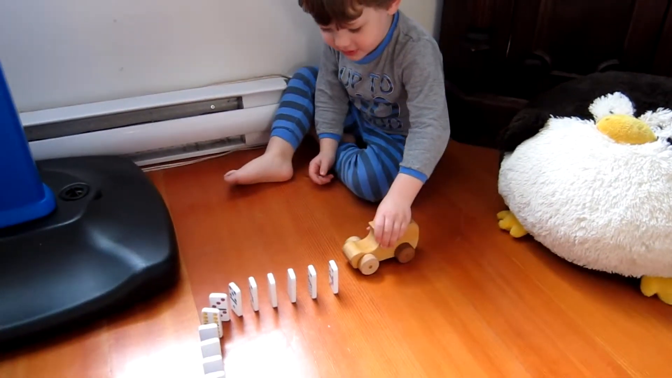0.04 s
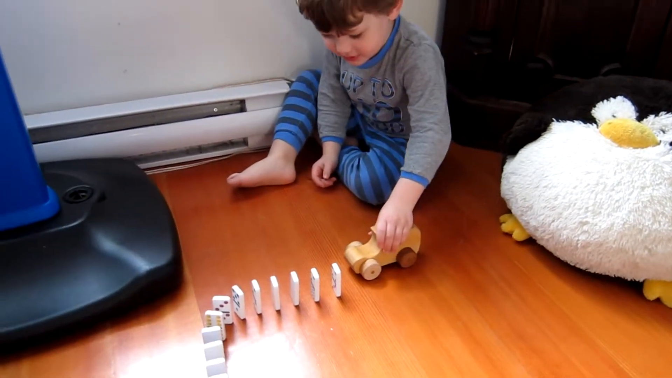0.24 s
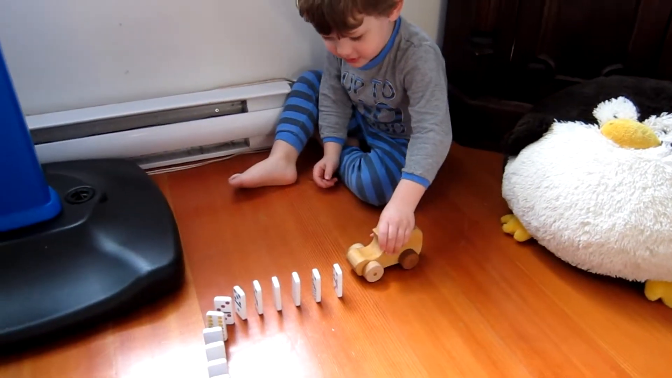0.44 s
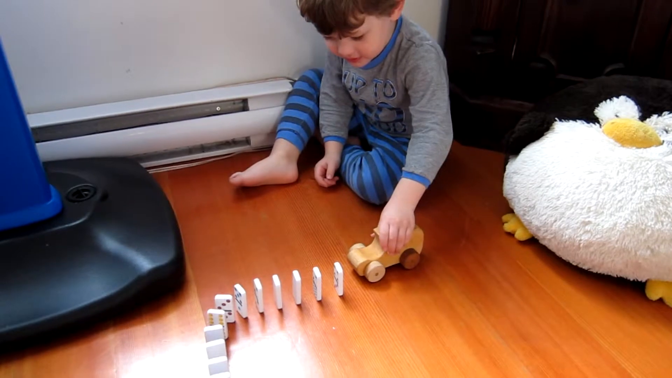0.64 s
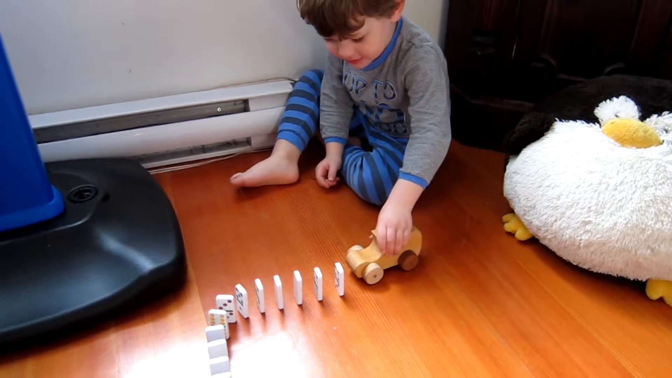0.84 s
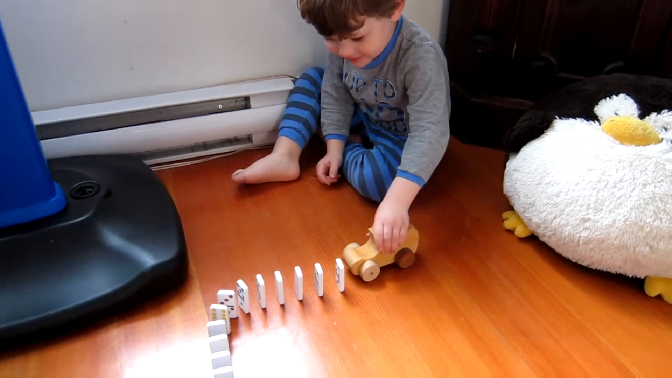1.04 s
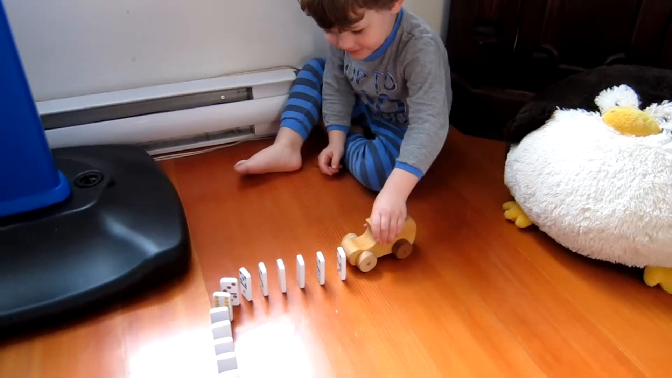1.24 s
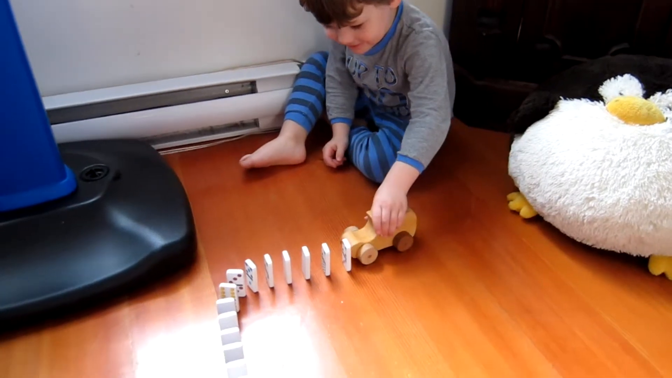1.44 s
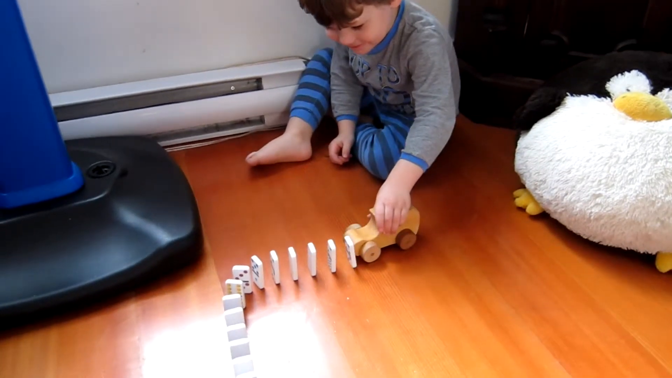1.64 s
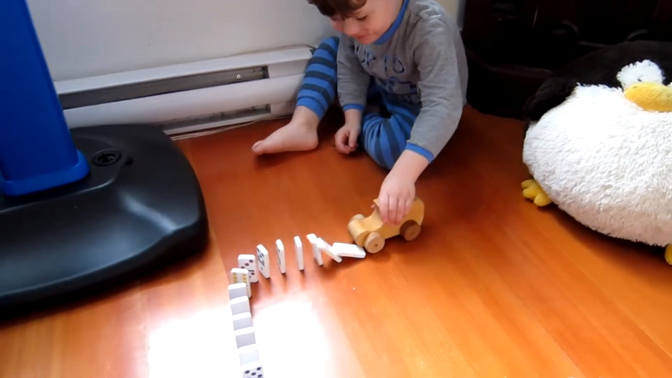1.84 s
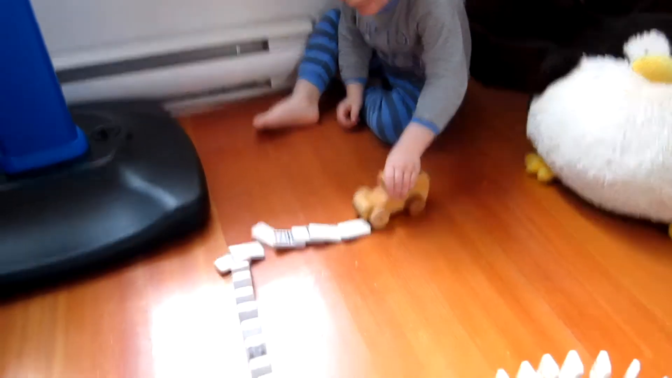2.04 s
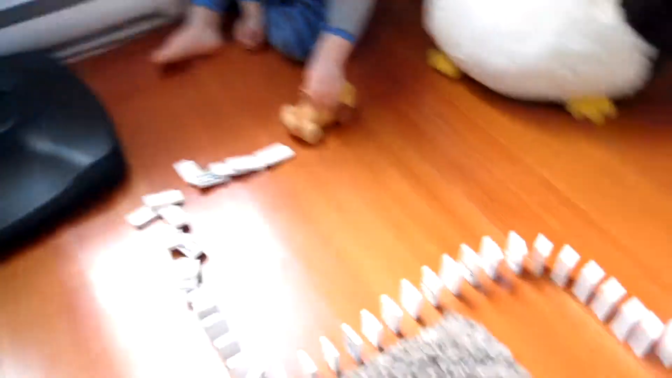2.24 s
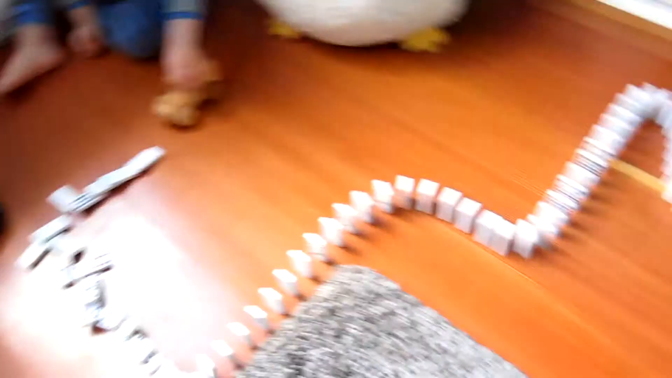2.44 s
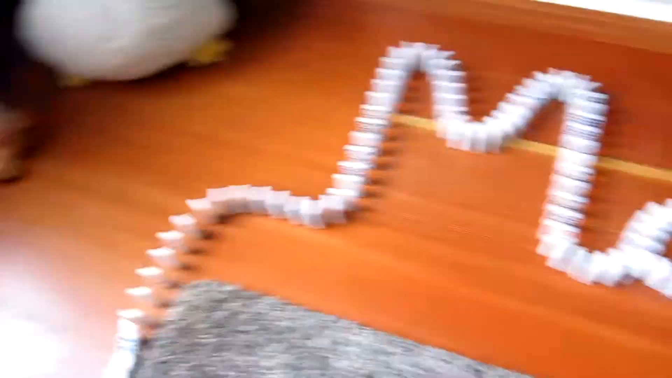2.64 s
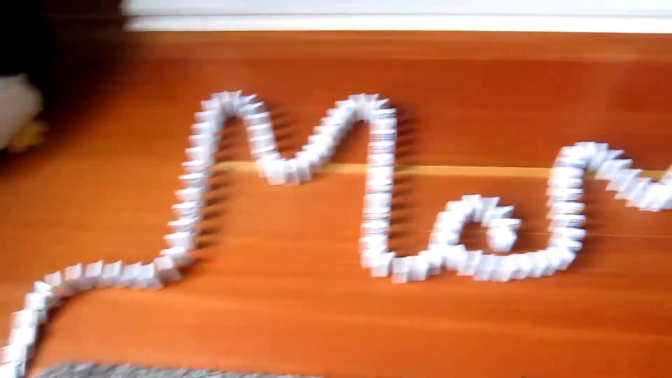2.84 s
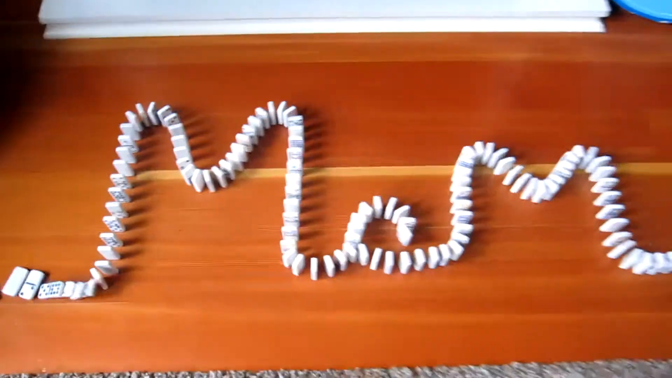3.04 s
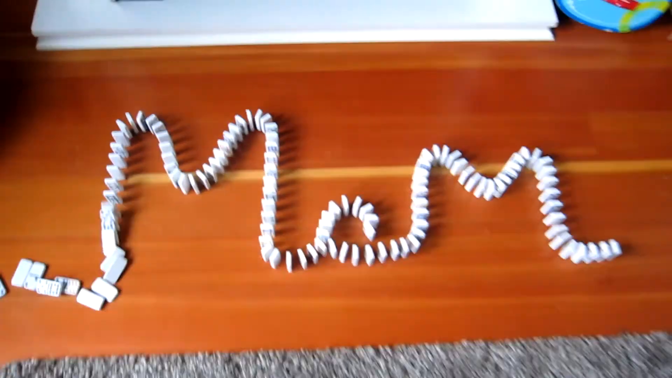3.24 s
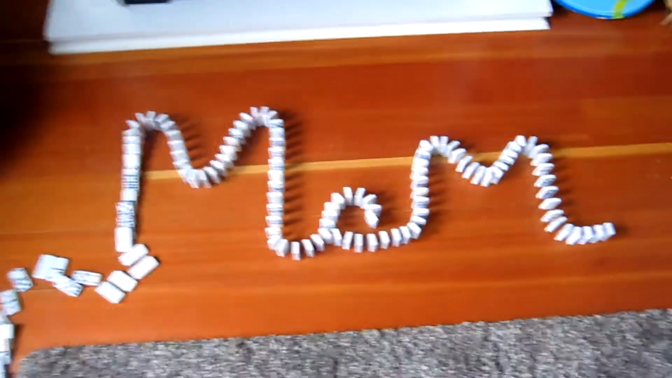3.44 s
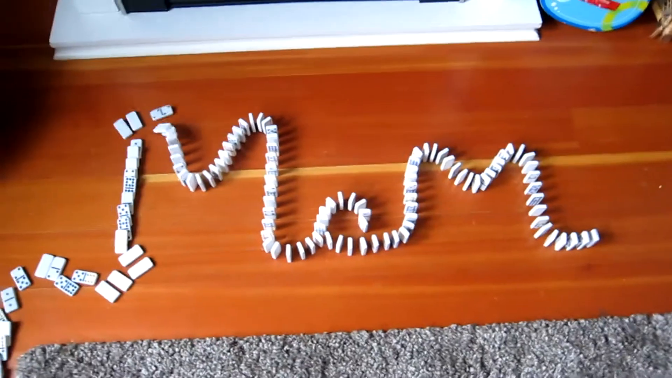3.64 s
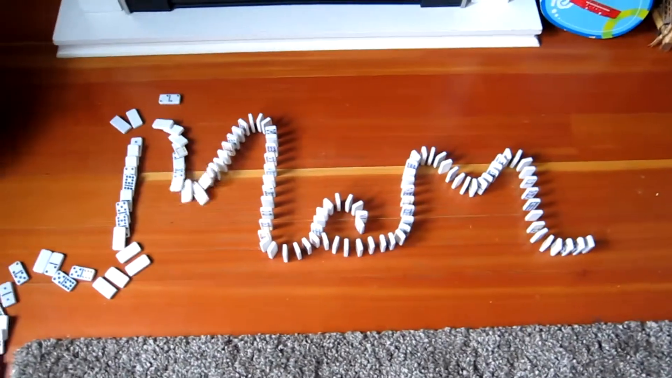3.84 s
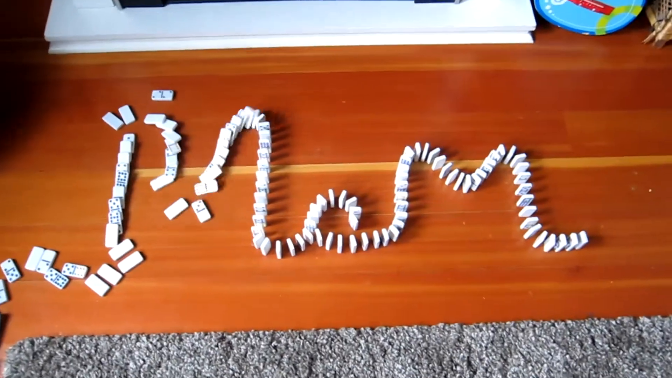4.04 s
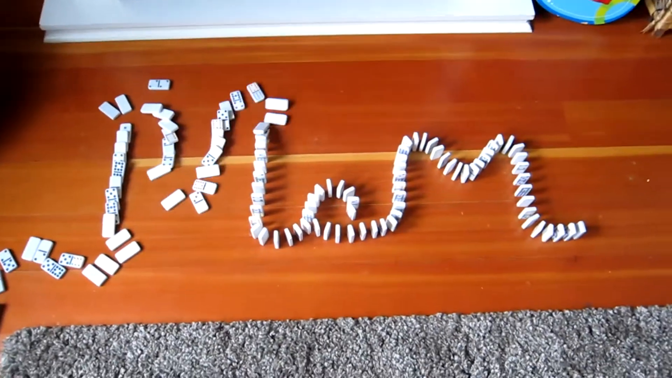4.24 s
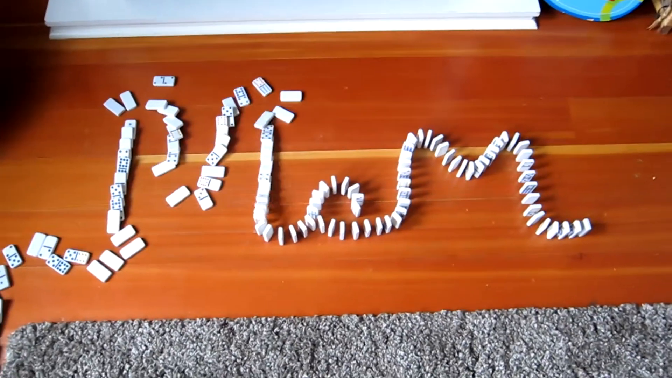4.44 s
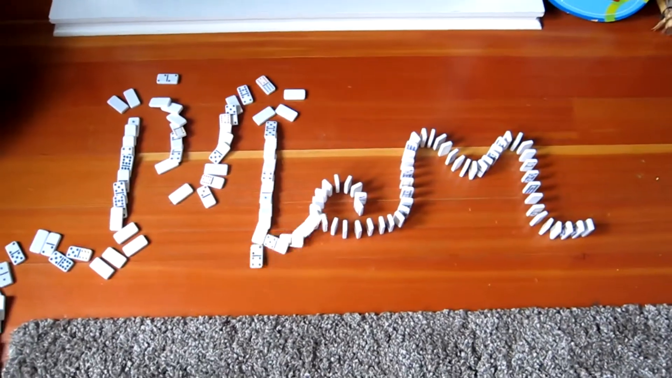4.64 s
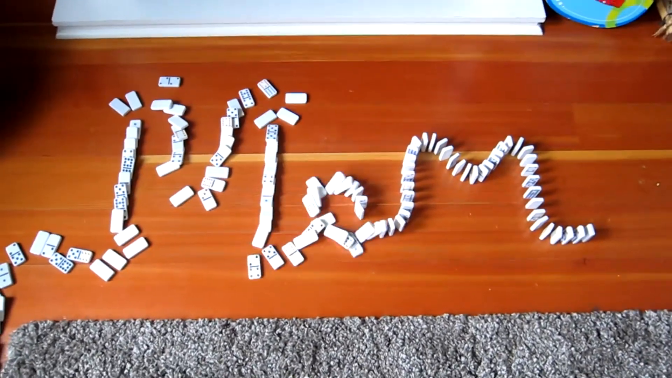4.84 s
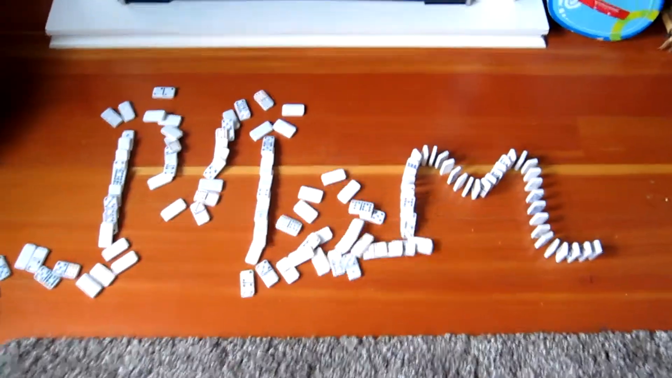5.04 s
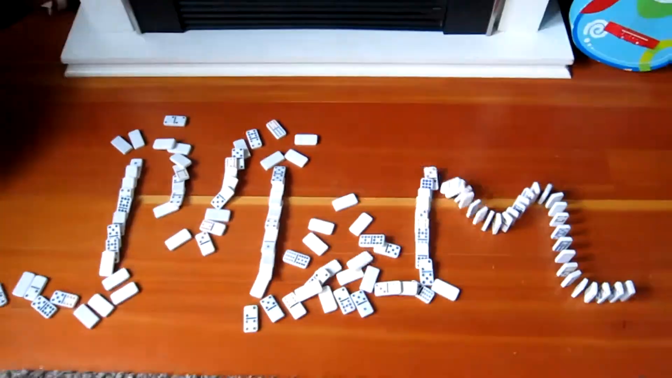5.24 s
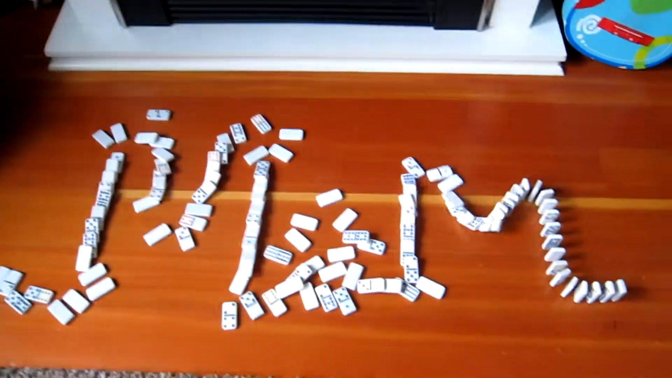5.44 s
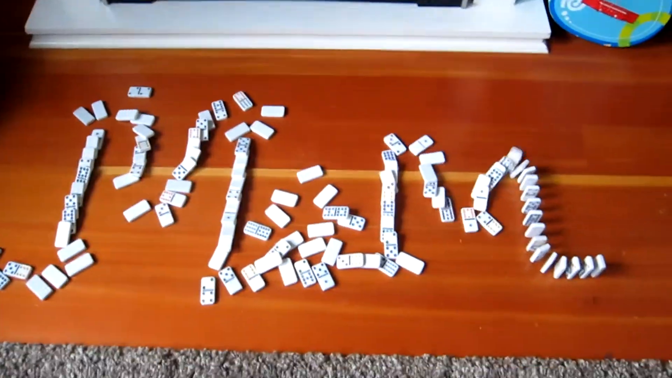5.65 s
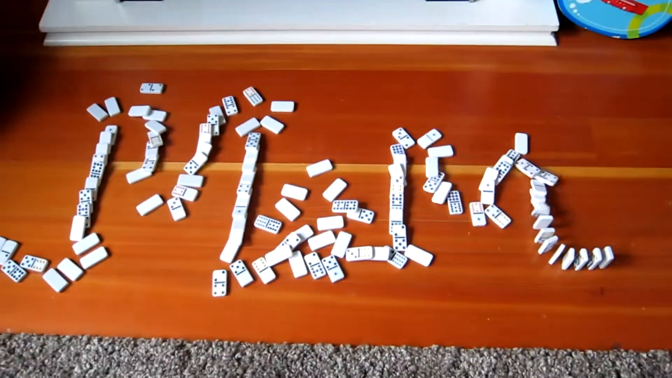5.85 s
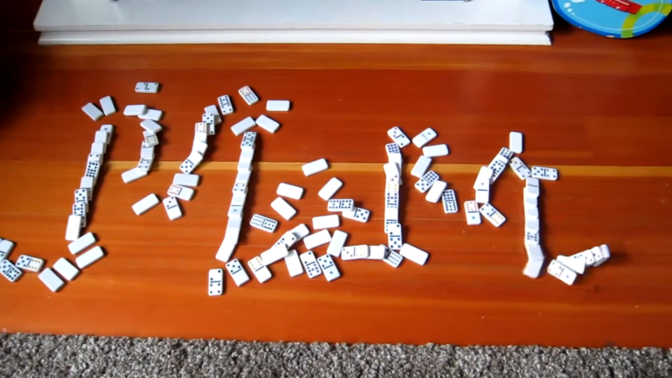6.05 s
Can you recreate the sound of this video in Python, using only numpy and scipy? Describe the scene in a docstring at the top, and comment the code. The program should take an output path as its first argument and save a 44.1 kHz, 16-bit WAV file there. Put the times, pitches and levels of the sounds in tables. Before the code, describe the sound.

After nearly two seconds of quiet room hum, a long chain of plastic dominoes topples on a wooden floor in a fast, bright clatter.

```python
"""A quiet room hums and hisses, with three faint ticks, then a long chain of plastic domino tiles
topples on a wooden floor, close to a hand-held camera with two microphone ports.
Each tile clacks (a coloured noise burst), rings briefly (damped sines) and slaps the boards;
sliding tiles rattle, the floorboards boom and the walls answer with a noise tail.
The camera's gain control pulls the hum down once the clatter starts."""
import sys
import numpy as np
from scipy import signal
from scipy.fft import rfft, irfft, next_fast_len
from scipy.io import wavfile
from scipy.ndimage import uniform_filter1d, map_coordinates

SR = 44100
rng = np.random.default_rng(int(sys.argv[2]) if len(sys.argv) > 2 else 0)


def transcribe(signal):
    """Save signal, clipped to [-1, 1], as a 16-bit WAV file at the path in sys.argv[1]."""
    frames = np.atleast_2d(signal).T
    limited = np.clip(frames, -1, 1)
    pcm = np.round(limited * 32767).astype(np.int16)
    wavfile.write(sys.argv[1], SR, pcm)


N = 269045

# Clear tile knocks, ahead of the gain control:
# (time [s], clack level [dB], ring level [dB], ring pitch [Hz])
TILE_KNOCKS = [(1.8625, 15, 18, 6805), (1.9028, -7, -2, 6500), (1.921, 7, 3, 7200),
               (1.926, 10.5, 17.5, 6540), (1.95, 7, -2, 6825), (1.9717, 9, 14.5, 6620),
               (1.979, 6, -6, 7300), (2.0022, 6.5, 16, 6440), (2.0126, 9.5, 1, 6660),
               (2.029, 9, 15.5, 6730), (2.0463, 10, 10, 6760), (2.076, 5, 15, 6560), (2.0869, 7, 5, 6430),
               (2.1014, 6.5, 16, 7000), (2.1171, 12, 12, 6845), (2.1352, 15.5, 10, 6550),
               (2.1605, 14.5, 14, 6860), (2.2652, 3, 13, 6720), (2.2914, 8, 1, 6600),
               (2.3238, 7.5, 13, 6900), (2.3354, 8.5, 12, 7400), (2.359, 4.5, 18, 7060),
               (2.3838, 1, 17.5, 6570), (2.417, 10, 20, 6700), (2.427, 6, 19, 6770),
               (2.455, 4.5, 20.5, 6655), (2.4733, 2, 20, 6770), (2.5096, 11, 14.5, 7040),
               (2.5457, 8, 10, 6910), (2.682, -1.5, 15, 6600), (2.7165, 6, 13.5, 6560),
               (2.7452, 9, 14, 6840), (2.808, 7, 7.5, 6600), (2.816, 12, -3, 6700), (2.9355, -1, 5, 7020),
               (3.0046, 0, -7, 6500), (3.0449, 11, -16, 6560), (3.0954, 10.5, 8.5, 6615),
               (3.1478, 11.5, 12.5, 6710), (3.2133, 9.5, -5, 6750), (3.3958, -4, 15, 6420),
               (3.4504, 3, 11, 6380), (3.4855, 5, 8, 6400), (3.525, -12, 3, 7300), (3.5374, 5.5, 5, 6960),
               (3.645, 3, -17, 6900), (3.6891, 12.5, -19, 6100), (3.7143, 8, 7, 7300),
               (3.8012, 8.5, 11, 7070), (3.8248, 1, 15, 6855), (3.841, 6, 14, 6980), (3.893, -3, 15, 7030),
               (3.9492, 12, -4, 7130), (3.957, 13, 8, 6940), (3.9702, 10, 8, 7056), (4.03, 4, 8, 6970),
               (4.0438, 6, 15, 6820), (4.068, -2, 13, 6795), (4.0997, 9.5, 8.5, 7000), (4.189, 9, 7, 6720),
               (4.2093, 12, 2, 7380), (4.2593, 4, 5, 6400), (4.2816, 13.5, -7, 7100),
               (4.3122, 11, 11, 6780), (4.326, 9, -1, 6650), (4.3798, 8, 19, 6620), (4.395, 5, -15, 6660),
               (4.4113, 6, 17.5, 6710), (4.4278, -2, 17, 6400), (4.4607, 7, 17, 6530),
               (4.5063, -8, 21, 6400), (4.5334, 8, 14.5, 6340), (4.6066, 10.5, 13, 6740),
               (4.6229, 16.5, 20.5, 6760), (4.7291, 9.5, 15, 6870), (4.7875, 6, 15.5, 6750),
               (4.8235, 7.5, 15.5, 6800), (4.8945, -1, 20, 6880), (4.9442, 14, 10.5, 6750),
               (4.9795, 17, -14, 7000), (5.0076, 17.5, 17, 6820), (5.021, -7, 15, 6950),
               (5.064, 15.5, 0, 6840), (5.0927, 14, 12, 6930), (5.1006, 12, 16, 6600),
               (5.1287, 15, 15.5, 6550), (5.1384, 8.5, 1, 6600), (5.1574, 9, 8, 6670), (5.1656, 7, 6, 6820),
               (5.189, 14, 12, 6520), (5.202, 11.5, 23.5, 6800), (5.2227, 0, 20, 6420),
               (5.282, -13, 15, 6530), (5.3231, 11.5, 8.5, 6730), (5.416, 7, 12.5, 6780),
               (5.4324, 14, 4, 7200), (5.4602, 10, 15, 6900), (5.55, 2, 9, 6470), (5.5556, 3, 15, 6900),
               (5.5806, 18.5, 7, 6440), (5.639, 9, 13, 6600), (5.7334, 18, 10.5, 6800),
               (5.832, 9.5, 1, 7210), (5.906, 6, 7, 6990), (5.9343, 0, 10.5, 6740), (5.96, 1, 11, 6460),
               (5.9821, 12.5, 1, 7340), (6.0446, 11, -7, 6825), (6.084, 9, 2, 6820)]
# Tiles sliding and bouncing on the heap: (time [s], clack level [dB],
# then ring, low and low-middle level relative to the clack [dB])
HEAP_RATTLE = [(1.903, -18, 2, 8, 3), (2.083, -17.5, 13.5, 9, 12), (2.2, -9.5, 1.5, -4.5, 3),
               (2.35, -17, 11, 8, 17), (2.55, -7, -2, -2.5, -1), (2.7, -15, 0.5, 7, 7.5),
               (2.802, -7, 5.5, -3.5, 6.5), (2.89, -8.5, 3.5, 0, 10.5), (2.99, -6.5, 2, 3, 12.5),
               (3.16, -11.5, 4, 2, -2), (3.33, -11.5, 4, -3, 3), (3.501, -5, 5, -1.5, -4.5),
               (3.6, -10.5, 1.5, -4, 5), (3.741, -7, 1.5, 1.5, 5.5), (3.97, -9, 4, 0, 5),
               (4.14, -7.5, 3.5, -2, 3.5), (4.32, -3.5, -7.5, -2, -4), (4.55, -6.5, 7.5, -7, -2.5),
               (4.69, -13, 2, 0, 2), (4.901, -4, 1.5, -1.5, -1.5), (5.15, -0.5, 2.5, -6.5, -4),
               (5.38, -9.5, 1.5, 3, -1.5), (5.48, -7, 4.5, 1, 0), (5.65, -4.5, 1, -3.5, 1),
               (5.832, -14.5, -8, 3.5, -7), (6.01, -4, 7.5, -9, 0), (6.1, -8.5, -5, -1, -9)]
# Where the fall is heard between the ports: (time [s], left-right difference [dB])
FALL_POSITION = [(1.9, 1.5), (3.3, 3), (4.8, 1), (5.5, 0.5), (6.1, -1.5)]
# The boards under the moving fall: (time [s], pitch of the woody slap [Hz], boom level [dB],
# rattle treble level relative to the clack [dB])
FLOOR_ALONG_FALL = [(1.9, 968, -22, -1), (2.1, 1284, -25, 8), (2.22, 1000, -39, -0.5), (2.36, 1200, -30, 6),
                    (2.6, 1375, -29, -0.5), (2.73, 760, -24.5, -3), (2.86, 910, -24, 3),
                    (3.0, 1370, -23.5, 0), (3.15, 1440, -29.5, -7), (3.35, 1230, -27.5, -3.5),
                    (3.5, 1370, -28, -1.5), (3.76, 1010, -23, -3.5), (3.95, 1250, -29, 2.5),
                    (4.15, 1240, -30.5, 3.5), (4.32, 1153, -27.5, -5), (4.55, 1396, -36, 3),
                    (4.7, 1040, -34, 0.5), (5.0, 1270, -23.5, -5), (5.2, 1330, -31, -5),
                    (5.32, 810, -25, -1), (5.55, 1225, -25.5, 0), (5.83, 1288, -32, -3),
                    (6.1, 1280, -26, -5)]


def amp(db):
    """dB to gain."""
    return np.exp(np.asarray(db) * (np.log(10) / 20))


def unit(x):
    """Scaled to rms 1."""
    return x / np.sqrt(np.mean(x ** 2) + 1e-20)


def along(points, hz):
    """Interpolates (Hz, value) points on a log-frequency axis."""
    f, v = np.transpose(points)
    return np.interp(np.log(hz + 1), np.log(f + 1), v)


def filtered(x, response):
    """x with its spectrum multiplied by a response of frequency."""
    m = next_fast_len(x.shape[-1] + 8192)  # padded so that tails do not wrap round
    spectrum = rfft(x, m) * response(np.fft.rfftfreq(m, 1 / SR))
    return irfft(spectrum, m)[..., :x.shape[-1]]


def spread(pair, alike, hz):
    """Two unrelated spectra become left and right with the given likeness."""
    turn = np.arccos(np.clip(along(alike, hz), -1, 1)) / 2
    mid = pair[0] * np.cos(turn)
    side = pair[1] * np.sin(turn)
    return np.array([mid + side, mid - side])


def place(s, sounds):
    """Sums stereo sounds (2, events, samples) into the scene at times s."""
    first = np.round(s * SR).astype(int)
    at = (first[:, None] + np.arange(sounds.shape[-1])).ravel()
    return np.array([np.bincount(at, c.ravel(), N + SR)[:N] for c in sounds])


def air():
    """Steady background noise, shaped by frequency, under hum tones of slightly wavering level and phase."""
    # Spectrum of the steady background noise, with a deep dip near 8.3 kHz:
    # (frequency [Hz], relative level [dB])
    air_colour = [(20, -7), (90, -11), (130, -7), (155, 4), (225, -9), (300, 1.5), (450, -5), (600, -6),
                  (1150, -8), (2500, -17), (6300, -22.5), (7600, -32), (8300, -38), (8900, -26.5),
                  (16000, -28)]
    # Likeness of the background noise at the two ports: (frequency [Hz], likeness [0-1])
    air_likeness = [(60, 0.59), (180, 0.87), (550, 0.77), (1650, 0.19), (4970, 0.057), (15000, 0.13)]
    # Mains and appliance tones: (frequency [Hz], rms level [dB])
    hum_tones = [(60, -52), (120, -67), (450, -61.5), (921, -69.5), (1001, -73.5), (1179, -72.5),
                 (8799, -77.5)]
    m = next_fast_len(N)
    hz, t = np.fft.rfftfreq(m, 1 / SR), np.arange(N) / SR
    spectrum = spread(rfft(rng.standard_normal((2, m))), air_likeness, hz)
    spectrum = spectrum * amp(along(air_colour, hz)) * (hz > 15)
    noise = irfft(spectrum, m)[:, :N]

    def waver():
        """A smooth random curve through six random points a second."""
        return map_coordinates(rng.standard_normal(64), [t * 6])

    hum = 0
    for f, db in hum_tones:
        level = np.sqrt(2) * amp(db + .5 * waver())
        hum = hum + level * np.sin(2 * np.pi * f * t + np.sqrt(f) / 60 * waver())
    return amp(-50.9) * unit(noise) + hum


def ticks():
    """Faint crackles near the camera: short gated bursts of tilted noise above 700 Hz."""
    # Ticks before the fall: (time [s], relative level [dB], length [s], treble tilt [dB per octave])
    faint_ticks = [(1.48, -45, 0.0048, 0), (1.584, -43, 0.0039, -12.5), (1.663, -36, 0.007, -2.5)]
    out, t = np.zeros((2, N)), np.arange(N) / SR
    for s, db, length, tilt_db in faint_ticks:
        gate = np.exp(-np.abs((t - s - length / 2) / length * 2) ** 4)
        tilt = lambda hz: amp(tilt_db * np.log2(hz / 4000 + 0.11)) * (hz > 700)
        out += amp(db - 5.5) * gate * filtered(rng.standard_normal((2, N)), tilt)
    return out


def blows(s, clack_db, ring_db, ring_hz, thud_db, hollow_db, snap_db, pan_db, crack_t60, rise, lead, size=768):
    """A burst of tiny contacts coloured by tile and boards, plus the tile's ringing.
    rise = s over which a glancing contact builds up, lead = s by which the left port hears it first."""
    # Spectrum of the clack: (frequency [Hz], relative level [dB])
    clack_colour = [(100, -54), (400, -15), (750, 4.5), (1300, 4), (3000, 6.5), (5000, 7), (7500, 4.5),
                    (10200, 5), (13000, -2.5), (16000, -17)]
    # Tile modes: (ratio to ring pitch, level relative to the ring [dB], t60 before scatter [s])
    tile_modes = [(1, -1.5, 0.032), (1.03, -17, 0.014), (1.14, -9.5, .018), (1.52, -19, 0.017)]
    # Likeness of the direct sound at the two ports: (frequency [Hz], likeness [0-1])
    direct_likeness = [(300, 1), (1500, 0.82), (6000, 0.26), (15000, 0.7)]
    slap_peak_db, slap_width, slap_scatter = 8, 0.068, .1  # width and scatter in log frequency
    crack_hz, crack_db, crack_width = 3020, 0.42, 0.46  # dB per unit of squareness, log width
    t, hz = np.arange(size) / SR, np.fft.rfftfreq(size, 1 / SR)

    onset = 1 - np.exp(-(t + 1 / SR) / rise[:, None])
    burst = rng.standard_normal((len(s), 2, size)).transpose(1, 0, 2)
    burst = burst * amp(-60 * t / crack_t60[:, None]) * onset
    square = np.minimum(0.00049 / rise, 18)
    burst[0, :, 0] += square  # a square hit opens with one clean crack
    # equal energy in every burst: the level and colour below decide its strength
    burst = 6 * burst / np.linalg.norm(burst, axis=-1, keepdims=True)

    low = 1 / (1 + (hz / 1400) ** 4)
    middle = 1 / (1 + (hz / 2800) ** 4)
    high = 1 / (1 + (8000 / (hz + 1)) ** 8)
    colour_db = along(clack_colour, hz) + clack_db[:, None]
    colour_db += np.outer(thud_db, low) + np.outer(hollow_db, middle - low) + np.outer(snap_db, high)
    slap_hz = np.interp(s, *np.transpose(FLOOR_ALONG_FALL)[:2])
    slap_hz = slap_hz * np.exp(slap_scatter * rng.standard_normal(len(s)))
    colour_db += slap_peak_db * np.exp(-(np.log((hz + 1) / slap_hz[:, None]) / slap_width) ** 2)
    crack_peak = np.exp(-(np.log((hz + 1) / crack_hz) / crack_width) ** 2)
    colour_db += crack_db * np.outer(square, crack_peak)
    cepstrum = irfft(colour_db * np.log(10) / 20, size)  # folded: the colour starts at the contact
    cepstrum[:, 1:size // 2] *= 2
    cepstrum[:, size // 2 + 1:] = 0

    chance = rng.standard_normal((len(s), len(tile_modes), 2))
    ring = 0
    for k, (ratio, db, t60) in enumerate(tile_modes):
        fade = amp(-60 * t / (t60 * np.exp(.2 * chance[:, k, :1])))
        overtone_scatter_db = (k > 0) * 5.53 * chance[:, k, 1:]
        level = amp(ring_db[:, None] + db + overtone_scatter_db)
        ring = ring + level * fade * np.sin(2 * np.pi * ratio * np.outer(ring_hz, t))
    faded = onset * np.cos(np.pi / 2 * t / t[-1])  # every ring is silent by the end of its short sound

    sound = spread(rfft(burst), direct_likeness, hz) * np.exp(rfft(cepstrum)) + rfft(ring * faded)
    half = np.array([.5, -.5])[:, None, None]  # left, right
    pan = amp(half * np.outer(pan_db, 1 - low))  # the lows stay centred
    later_port = half - .5 * np.sign(lead)[:, None]  # only the farther port is delayed
    delay = np.exp(2j * np.pi * np.outer(lead, hz) * later_port)
    return place(s, irfft(sound * pan * delay, size))


def knocks():
    """The tile-on-tile knocks that stand out of the clatter; hard ones start at once and end sooner."""
    s, db, ring_db, ring_hz = np.transpose(TILE_KNOCKS)
    when, _, _, heap_low, _ = np.transpose(HEAP_RATTLE)
    chance = rng.standard_normal((len(s), 4))
    # the low level follows the heap's; harder knocks are thinner
    thud = -6.5 + np.interp(s, when, heap_low) - 0.23 * (db - db.mean()) + 3 * chance[:, 0]
    hollow = 0.74 * thud + 2.6
    snap = -2 + .45 * (ring_db - db) + 4.5 * chance[:, 1]  # edge hits ring more and snap more
    pan = np.interp(s, *np.transpose(FALL_POSITION)) - chance[:, 2]
    lead = 2.5e-5 + 1.2e-5 * chance[:, 3]
    flatness_db = np.minimum(ring_db - db, 0)  # hits with little ring end sooner
    crack_t60 = 0.035 * amp(-.4 * db + 0.12 * flatness_db)
    rise = 0.0012 * amp(-1.6 * db)
    return blows(s, db, ring_db, ring_hz, thud, hollow, snap, pan, crack_t60, rise, lead)


def rattle(count=2000):
    """Dense small contacts at random moments, a few much stronger than the rest."""
    when, *controls = np.transpose(HEAP_RATTLE)
    draw = rng.random((count, 7))
    s = when[0] + (when[-1] - when[0]) * draw[:, 0]
    clack_db, ring, thud, hollow = [np.interp(s, when, c) for c in controls]
    db = clack_db - 3 * np.log(draw[:, 1] + 0.01)
    ring_db = db + ring + 9 * (draw[:, 2] - .5)
    knock_s, *_, knock_hz = np.transpose(TILE_KNOCKS)  # tiles near each other ring alike
    ring_hz = np.interp(s, knock_s, uniform_filter1d(knock_hz, size=5))
    ring_hz = ring_hz + 422 * (draw[:, 2] + draw[:, 3] - 1)  # scatter up to 422 Hz either way
    treble = np.interp(s, *np.transpose(FLOOR_ALONG_FALL)[[0, 3]])
    pan = 5 * (draw[:, 4] - .45) + 0.94 * np.interp(s, *np.transpose(FALL_POSITION))
    lead = 3e-5 * (draw[:, 5] + 0.35)
    rise = 0.0001 + 0.00077 * draw[:, 6]
    crack_t60 = np.full(count, 0.036)
    return blows(s, db, ring_db, ring_hz, thud, hollow, treble, pan, crack_t60, rise, lead)


def boom(count=500):
    """Tiles landing flat set the floorboards booming: random pushes drive resonances of the wood."""
    # Floorboard resonances: (frequency [Hz], width [Hz], relative level [dB])
    board_modes = [(202, 52, -7.5), (269, 45, 2.5), (435, 252, -1)]
    when, _, boom_db, _ = np.transpose(FLOOR_ALONG_FALL)
    draw = rng.random((count, 2))
    s = when[0] + (when[-1] - when[0]) * draw[:, 0]
    pushes = np.bincount((s * SR).astype(int) % N, 2 * draw[:, 1] - 1, N)

    def wood(f):
        """Sum of resonances with alternating sign."""
        total = 0
        for k, (centre, width, db) in enumerate(board_modes):
            resonance = 1j * f * width / (centre * centre - f * f + 1j * f * width)
            total = total + (-1) ** k * amp(db) * resonance
        return total

    level_db = np.interp(np.arange(N) / SR, when, boom_db, left=-120)
    return amp(level_db) * unit(filtered(pushes, wood))


def room(x, block=8192):
    """The walls answer with decaying noise; as the fall travels, each stretch gets its own tail."""
    # Decay of the room: (frequency [Hz], t60 [s])
    room_decay = [(200, 0.53), (1000, 0.43), (4000, 0.24), (12000, 0.08)]
    # Likeness of the tail at the two ports: (frequency [Hz], likeness [0-1])
    tail_likeness = [(60, 1), (180, 1), (550, 0.93), (1650, 0.44), (4970, 0.033), (15000, 0.029)]
    out = np.zeros((2, N + 2 * SR))
    for a in range(0, N, block):
        hz, t, z = signal.stft(rng.standard_normal((2, SR // 3)), SR, nperseg=256)
        z = spread(z.transpose(0, 2, 1), tail_likeness, hz).transpose(0, 2, 1)
        decay = amp(-60 * t / along(room_decay, hz)[:, None])
        tail = signal.istft(z * decay, SR, nperseg=256)[1]
        wet = signal.fftconvolve(x[None, a:a + block], tail / np.linalg.norm(tail[0]), axes=1)
        start = a + 150  # samples: the tail sets in 3.4 ms after the direct sound
        out[:, start:start + wet.shape[1]] += wet
    return out[:, :N]


def bump():
    """One low bump on the camera body: a decaying sine, alike at both ports."""
    # The bump: (time [s], peak level [dB], frequency [Hz], t60 [s])
    body_bump = (3.366, -23, 46, .14)
    s, db, hz, t60 = body_bump
    since = np.clip(np.arange(N) / SR - s, 0, None)
    return amp(db - 60 * since / t60) * np.sin(2 * np.pi * hz * since)


def scene():
    """Tiles close by and their room tail, over the ticks, the bump and the room's hum."""
    background = air() + ticks()
    tiles = knocks() + rattle() + boom()
    return background + tiles + amp(-7.5) * room(tiles.mean(0)) + bump()


def record(dry):
    """Port colour, a notch, gain control with fast attack and slow release, soft clipping, band limit."""
    # The two microphone ports differ: (frequency [Hz], left-right difference [dB])
    port_difference = [(60, 0.5), (700, -0.5), (1290, 2), (2380, -3.5), (4400, 1.5), (7000, 3),
                       (10000, -0.5), (15000, -2)]
    # The camera filters out one narrow band: (centre [Hz], 3.24 times the 1/e half-width [Hz], depth [dB])
    camera_notch = (8230, 1330, -14)
    threshold_db, slope, release_db_per_s = -26.0, .7, 4  # slope: dB of cut per dB above threshold
    centre, width, depth_db = camera_notch

    def ports(hz):
        """Left and right response, notch included."""
        notch = amp(depth_db * np.exp(-((hz - centre) / width * 3.24) ** 2))
        return notch * amp(np.outer([.5, -.5], along(port_difference, hz)))

    x = filtered(dry, ports)
    power = np.abs(uniform_filter1d(np.mean(x ** 2, 0), size=1024))
    loud_db = 10 * np.log10(power + 1e-12)
    fall_db = release_db_per_s * np.arange(N) / SR
    held_db = np.maximum.accumulate(loud_db + fall_db) - fall_db  # the loudest recent moment, slowly forgotten
    excess_db = np.clip(uniform_filter1d(held_db, size=256) - threshold_db, 0, None)
    x = x * amp(-slope * excess_db)
    x = x / (1 + np.abs(x / 1.05) ** 6) ** (1 / 6)  # soft clipping towards 1.05
    return filtered(x, lambda hz: hz < 16000)


dry = scene()
out = record(dry)
transcribe(out)
```